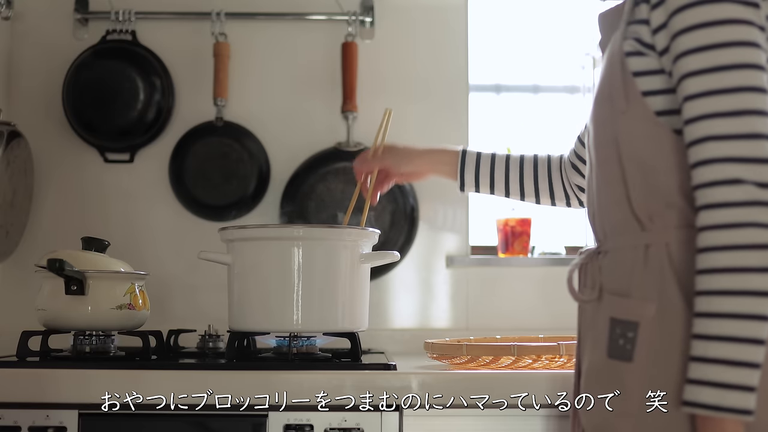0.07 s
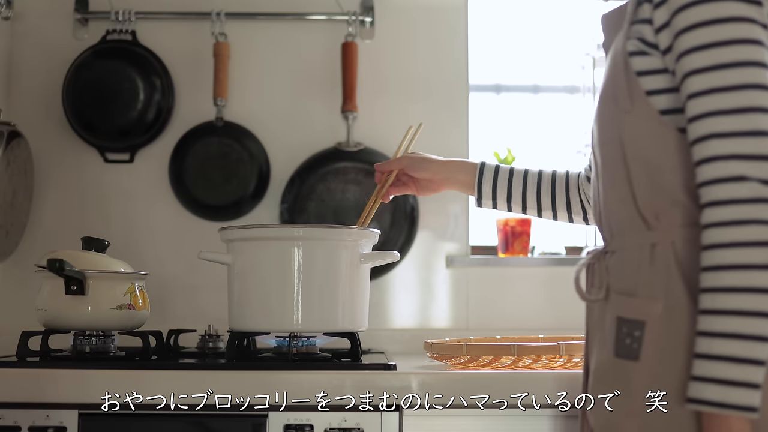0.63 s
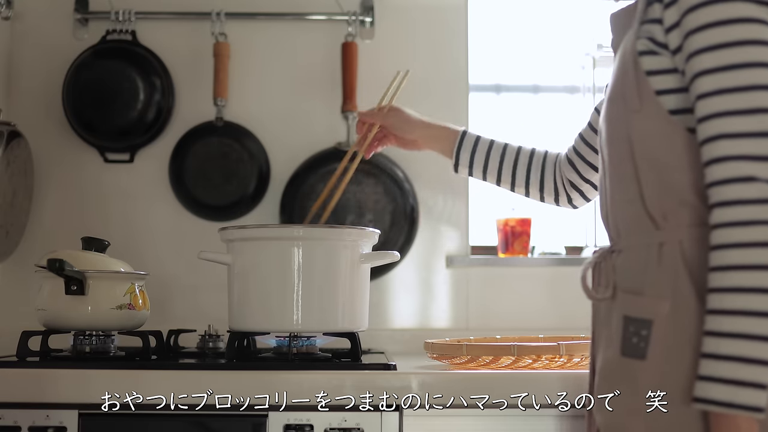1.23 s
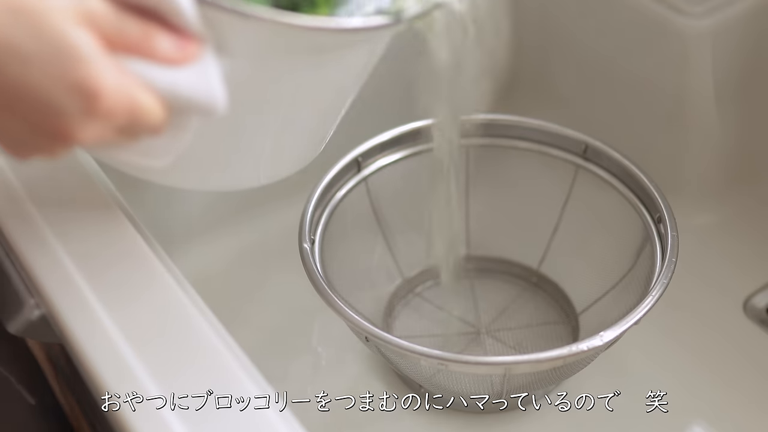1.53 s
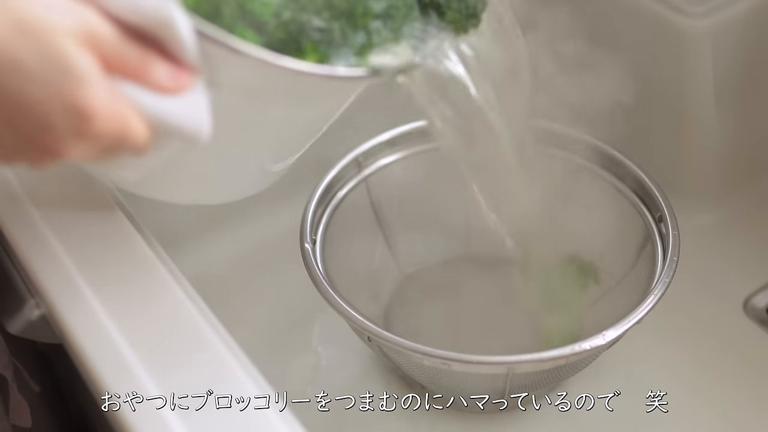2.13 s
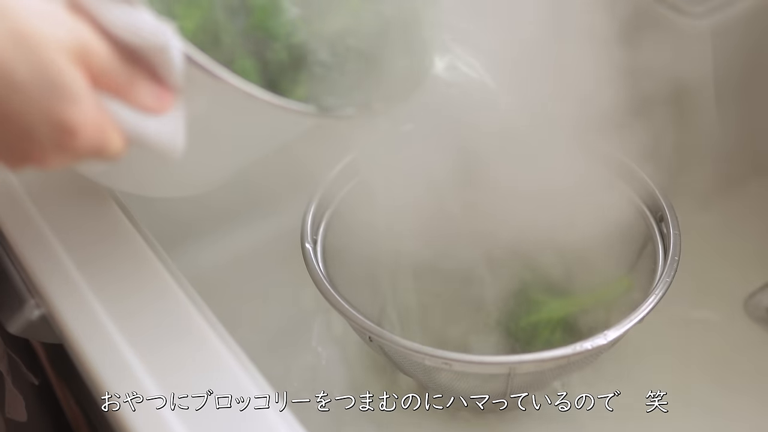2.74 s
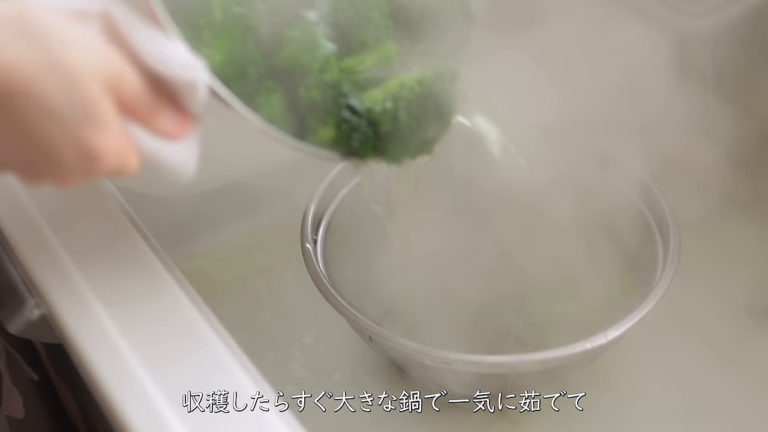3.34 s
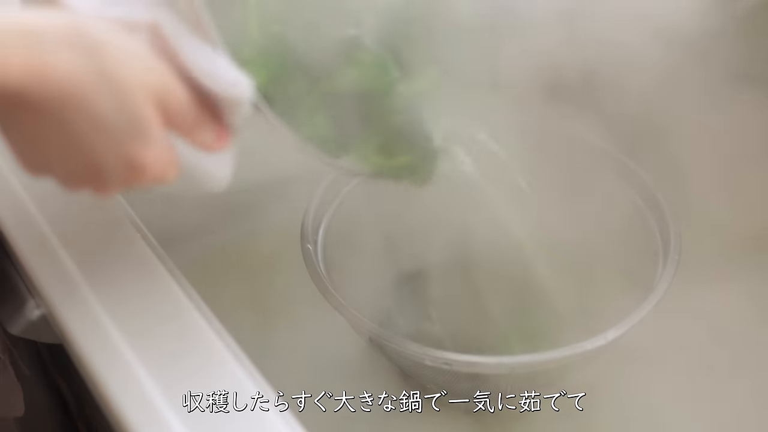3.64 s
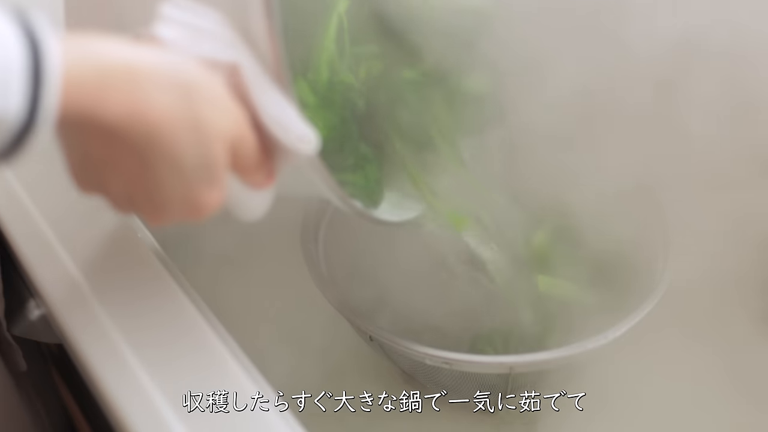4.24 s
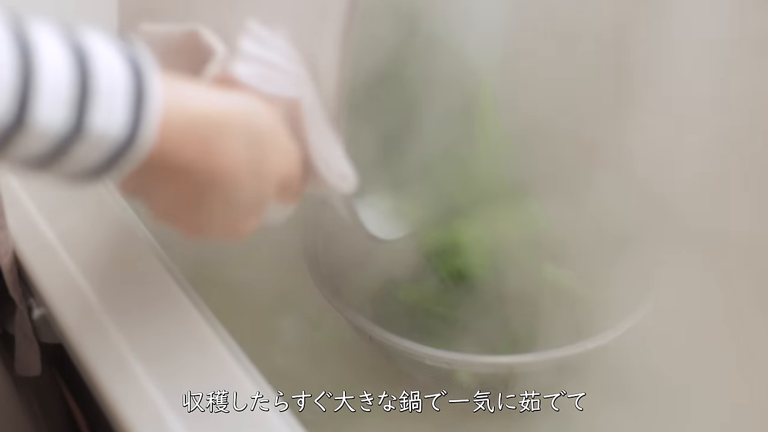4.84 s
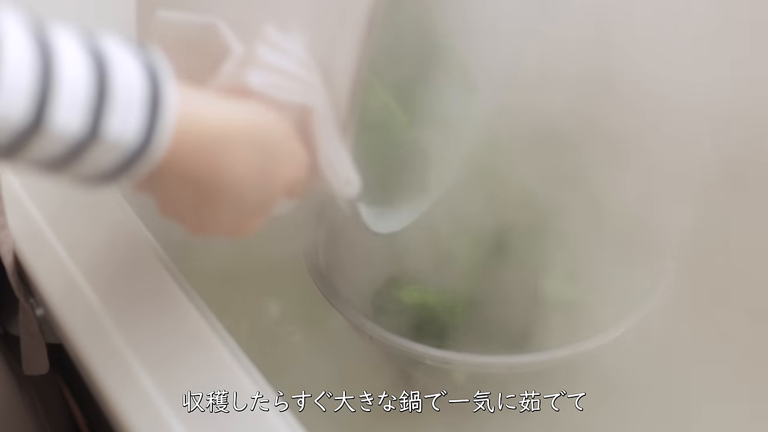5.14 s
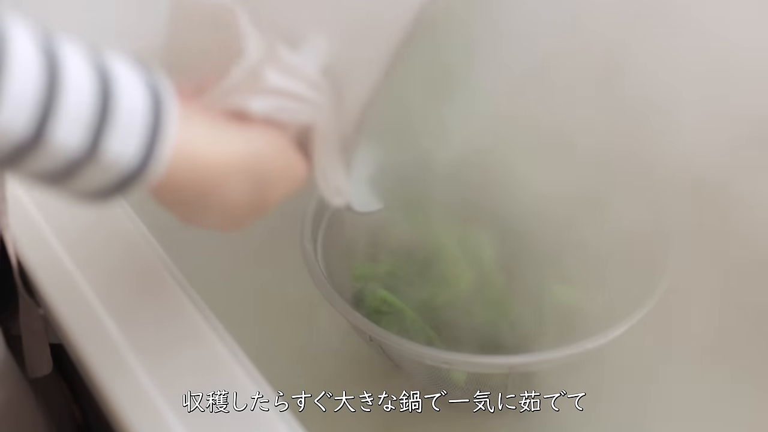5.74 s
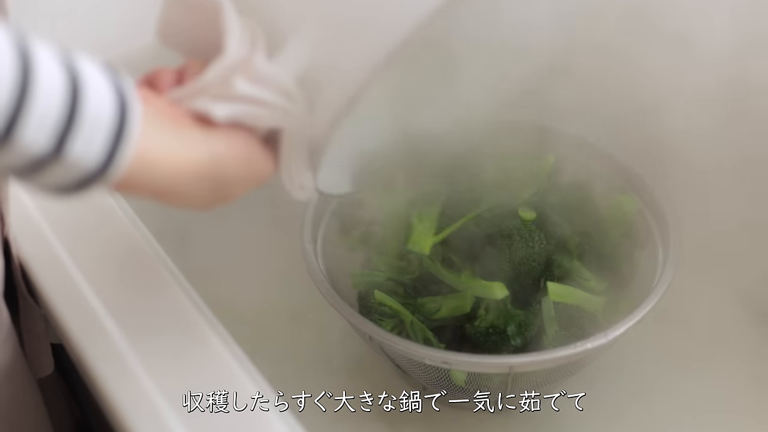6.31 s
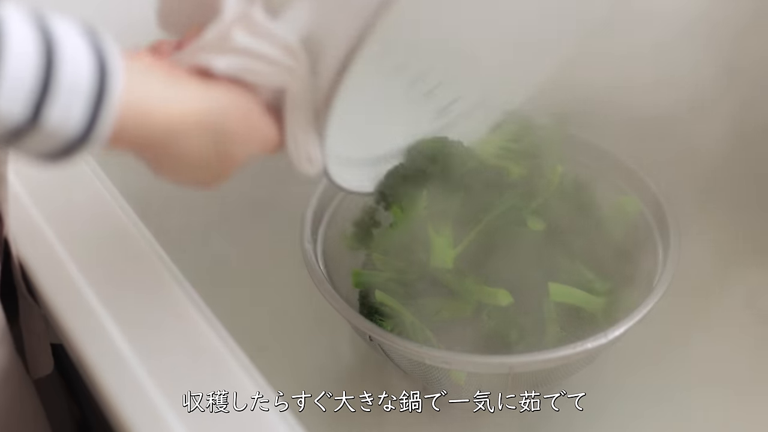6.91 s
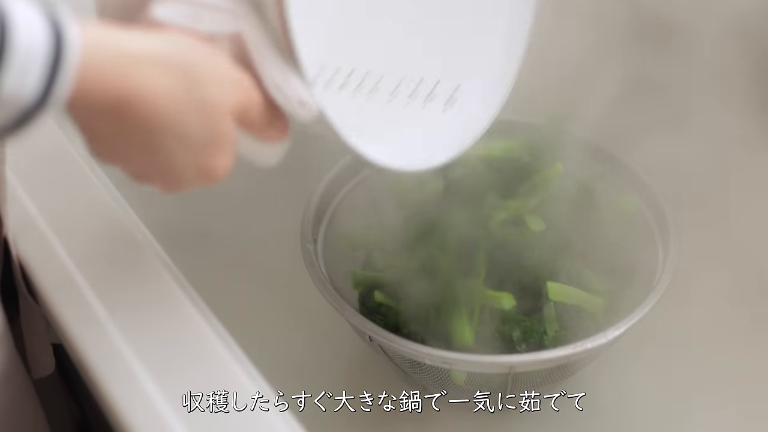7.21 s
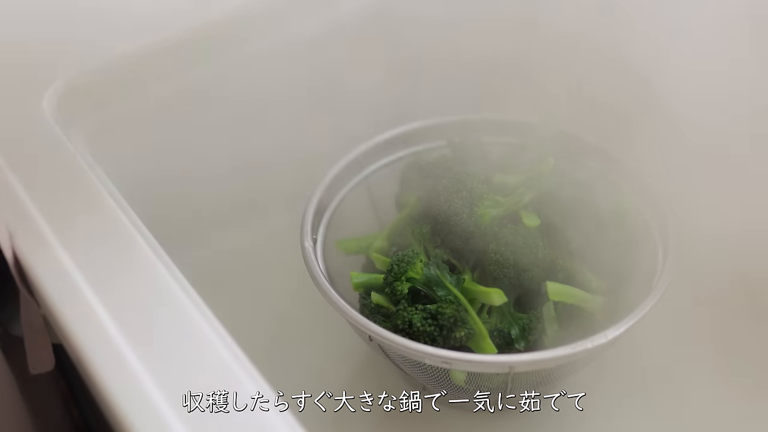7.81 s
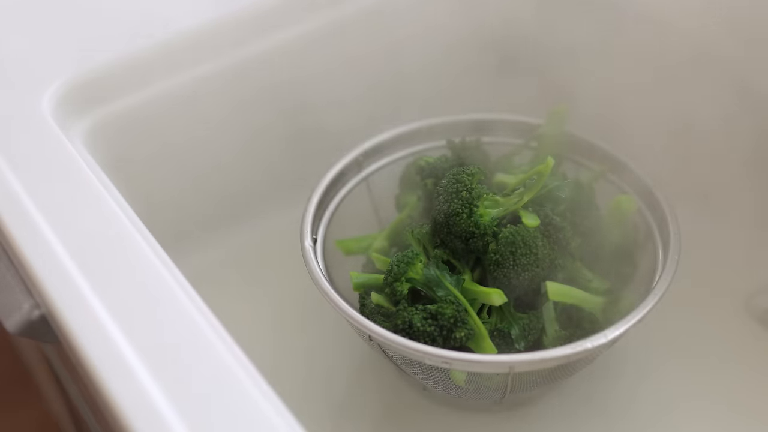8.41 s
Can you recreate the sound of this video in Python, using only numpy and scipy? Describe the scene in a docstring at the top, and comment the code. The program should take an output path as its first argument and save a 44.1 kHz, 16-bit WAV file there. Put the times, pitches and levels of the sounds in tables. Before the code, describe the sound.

A pot simmers softly over a hissing gas burner, then the sound cuts off. Water pours into a wire colander in a kitchen sink, spattering and bubbling, with gushes slapping the basin. Boiled vegetables tumble in with soft, low thuds. The pour thins to a dull trickle, a few drips and hollow gulps from the drain. Everything is heard close up in a small kitchen.

```python
"""Draining a pot of broccoli

A pot simmers over a hissing gas burner; then its hot water and broccoli are poured into a wire
colander in a steel sink. Droplet impacts and ringing air bubbles make the spatter, gushes slap the
basin, and falling florets and the gulping drain excite its low resonances. The pour thins to a dull
gurgle with a few drips."""
import sys
import numpy as np
from scipy import signal
from scipy.fft import rfft, irfft, next_fast_len
from scipy.io import wavfile
from scipy.ndimage import uniform_filter1d

SR = 44100
rng = np.random.default_rng(int(sys.argv[2]) if len(sys.argv) > 2 else 0)


def to_wav(s):
    """Save 16-bit WAV."""
    ch = np.atleast_2d(s).T  # columns
    pcm = np.round(np.clip(ch, -1, 1) * 32767)  # PCM
    wavfile.write(sys.argv[1], SR, pcm.astype(np.int16))


N = 373086
T = np.arange(N) / SR
STOVE_END_S, POUR_START_S, SEEP_START_S = 1.427, 1.645, 5.37

# Spectra of the burner and of the quiet kitchen: (frequency [Hz], relative level [dB])
STOVE_SPECTRUM = [(30, -23), (145, -11), (252, -1.5), (721, -4.5), (1070, -7.5), (1540, -5), (2000, -9.5),
                  (2650, -8.5), (3400, -11), (11400, -23), (13300, -21.5), (16000, -32)]
ROOM_SPECTRUM = [(24, -35.5), (40, -1.5), (306, -10), (502, 2.5), (1000, -12.5), (6460, -15.5),
                 (15000, -19.5)]
# Strength of the stream as the pot is tipped: (time [s], level [dB])
POUR_LEVELS = [(1.65, -45), (1.77, -37), (1.97, -37.5), (2.2, -37), (2.37, -42.5), (2.6, -43.5),
               (2.94, -36), (3.33, -35.5), (3.68, -39.5), (3.96, -39.5), (4.07, -40.5), (4.32, -38),
               (4.42, -45), (4.8, -44), (4.95, -49), (5.04, -44.5), (5.26, -51.5), (5.33, -55.5)]
# Spectrum of droplets on mesh and steel: (frequency [Hz], relative level [dB])
SPATTER_SPECTRUM = [(350, -47.5), (600, -14), (920, 2), (1110, 1), (1240, -1.5), (1430, -5), (2180, 0.5),
                    (3120, 4), (4050, 1.5), (6290, -2), (12000, -10.5), (14700, -16.5), (16000, -17)]
# Modes of sink and colander, rung by droplets: (frequency [Hz], relative level [dB], t60 [s])
STEEL_MODES = [(891, -27.5, 0.087), (1950, -28, 0.052), (2550, -26, 0.032), (2860, -23.5, 0.02),
               (1167, -22.5, 0.044), (6170, -23, 0.047)]
# Low middle of the splash against its patter: (time [s], relative level [dB])
SPLASH_BODY_LEVELS = [(1.92, -16.5), (2.33, -3), (3.2, -10.5), (3.9, -4), (4.3, -4.5), (4.45, -11.5),
                      (5.1, -8.5), (5.4, -3.5)]
# Spectra of the drumming sink floor and the drain's hollow: (frequency [Hz], relative level [dB])
DRUM_SPECTRUM = [(40, -26.5), (55, -26), (85, -10), (112, -16), (168, 3), (215, -5), (500, -12),
                 (900, -51.5)]
HOLLOW_SPECTRUM = [(150, -39.5), (260, -10.5), (330, -2), (380, 2.5), (440, -0.5), (520, -10.5),
                   (610, -16.5), (720, -12), (900, -27), (1500, -63.5)]
# Swells of low gurgling and drumming, from tumbling florets or the gulping drain:
# (time [s], peak level [dB], rise [dB/s], fall [dB/s], relative level on the floor [dB])
GURGLE_SURGES = [(2.06, -74, 69, 110, 17), (2.705, -46.5, 166, 198, -8), (3.65, -50, 45, 73, 0),
                 (3.96, -46, 110, 32, -3.5), (4.55, -50, 133, 63, -15), (5.14, -44.5, 31, 24.5, -19.5),
                 (5.37, -47.5, 200, 71, -6.5), (5.58, -50, 197, 104, -9.5), (5.88, -56, 168, 61, -8),
                 (6.17, -50.5, 60, 59, -10), (6.62, -43, 36.5, 22.5, -18), (6.87, -46, 85, 44.5, -10),
                 (7.14, -51.5, 109.5, 34.5, -18), (7.44, -58.5, 110.5, 62, -16.5),
                 (7.94, -56.5, 75, 25, -14.5), (8.258, -47, 257.5, 87.5, -19), (8.46, -51, 111.5, 90, -9)]
# Blows on the basin and gulps of the drain: (time [s], peak level [dB], pitch [Hz], swell time [s])
BASIN_THUDS = [(1.665, -48, 174, 0.015), (1.779, -48.5, 205, 0.013), (1.963, -46.5, 171, 0.02),
               (2.06, -45.5, 161, .025), (2.692, -38, 372, 0.0081), (2.713, -38, 260, 0.008),
               (2.808, -35, 169, 0.0086), (3.555, -19.5, 278, 0.0043), (3.592, -26, 298, 0.0045),
               (3.664, -38, 205, 0.014), (3.709, -33, 273, 0.0092), (3.763, -31.5, 190, 0.0059),
               (3.859, -33, 310, .005), (3.878, -29, 370, 0.005), (3.928, -23.5, 346, 0.0041),
               (3.948, -26.5, 400, 0.0067), (3.975, -21, 315, 0.0042), (3.994, -34, 290, 0.0038),
               (4.074, -38, 234, 0.0067), (4.109, -31.5, 208, 0.0084), (4.215, -37, 410, 0.01),
               (4.552, -39, 337, 0.017), (4.574, -42, 340, 0.0091), (4.691, -39.5, 315, 0.02),
               (4.844, -38.5, 312, 0.01), (4.857, -45, 180, 0.012), (4.964, -31, 354, 0.0074),
               (5.046, -34, 348, 0.005), (5.1, -30, 403, 0.0065), (5.123, -26, 377, 0.0083),
               (5.143, -35.5, 379, .008), (5.298, -24.5, 368, 0.0051), (5.362, -47.5, 180, 0.014),
               (5.445, -35, 390, 0.0081), (5.565, -33.5, 396, 0.008), (5.584, -46, 194, 0.014),
               (6.146, -34.5, 343, 0.01), (6.166, -34, 360, 0.015), (6.198, -35, 350, 0.0087),
               (6.216, -35.5, 365, 0.012), (6.294, -33.5, 362, 0.0082), (6.361, -34, 232, 0.0077),
               (6.384, -29.5, 345, 0.0049), (6.4, -34, 363, 0.0049), (6.485, -30, 356, 0.0058),
               (6.556, -24.5, 388, 0.0067), (6.619, -19.5, 397, 0.0049), (6.632, -28.5, 397, 0.011),
               (6.654, -31.5, 373, 0.016), (6.696, -29.5, 429, 0.0043), (6.721, -30, 383, .007),
               (6.76, -31, 377, 0.018), (6.812, -36, 260, .006), (6.823, -25, 370, 0.0081),
               (6.835, -22.5, 390, 0.0047), (6.846, -25, 440, 0.0044), (6.861, -25, 372, 0.01),
               (6.913, -33, 275, 0.0062), (6.938, -31, 294, 0.0054), (6.95, -26.5, 369, 0.0057),
               (7.007, -36, 226, 0.011), (7.012, -26.5, 373, 0.0081), (7.123, -29, 385, 0.0091),
               (7.295, -39.5, 387, .007), (7.316, -40.5, 340, 0.011), (7.345, -50, 206, 0.012),
               (7.702, -52, 362, 0.0063), (7.936, -42, 421, 0.009), (8.218, -33, 398, 0.0056),
               (8.256, -30, 401, 0.017), (8.268, -47, 225, 0.013), (8.293, -38, 407, .009)]
# Modes of the basin and of its floor, rung by thuds: (frequency [Hz], gain [dB], t60 [s])
BASIN_RESONANCES = [(304, -4, 0.16), (358, 4, 0.12), (463, -8, 0.12), (727, 7.5, .14)]
FLOOR_RESONANCES = [(168, -49, 0.14), (199, -47, 0.048)]
# Single drops ticking on the steel: (time [s], level [dB], pitch [Hz])
DROP_TICKS = [(1.8246, -29, 4800), (2.138, -23, 5080), (2.4424, -22.5, 4700), (2.445, -21.5, 6220),
              (2.9076, -20, 3500), (3.1268, -26.5, 3130), (3.1815, -24, 3670), (3.317, -24, 4130),
              (3.6179, -24.5, 2610), (3.9472, -26.5, 5530), (4.633, -40, 2470), (5.012, -27, 4300),
              (5.5615, -48, 2510), (5.811, -47, 5700), (6.0114, -53, 2740), (6.257, -51, 2500),
              (6.518, -54, 3630), (6.768, -51.5, 5920), (6.892, -56, 2970), (7.5571, -63, 5790),
              (7.701, -63.5, 3550), (8.371, -57, 3280)]
# Air pockets closing with a plop: (time [s], level [dB], pitch [Hz])
AIR_POCKETS = [(1.825, -47, 700), (2.055, -36.5, 980), (2.429, -39, 930), (2.837, -31.5, 920),
               (2.925, -36, 900), (3.176, -35, 756), (3.796, -26, 1900), (4.123, -27.5, 2390),
               (4.508, -37.5, 1980), (4.588, -40, 1890), (4.684, -39.5, 1030), (5.005, -32.5, 2010),
               (5.127, -40, 730), (5.37, -40.5, 1890), (5.443, -49, 789), (5.97, -49, 730),
               (6.165, -49, 720), (6.49, -49.5, 690), (6.6, -49.5, 1360), (6.615, -49, 1360),
               (6.648, -48, 1370), (6.698, -39.5, 706), (6.736, -49.5, 740), (6.833, -42, 726),
               (6.848, -41, 673), (6.88, -47, 720), (6.962, -54.5, 1800), (7.009, -47, 784),
               (7.211, -49.5, 850), (7.418, -52.5, 846), (7.476, -54, 779), (7.577, -55, 828),
               (7.703, -60, 660), (8.003, -58, 1965), (8.292, -47.5, 970), (8.294, -59, 1590),
               (8.384, -55, 1630)]
# Gushes and florets slapping the basin: (time [s], crack level [dB], fall time [s], thump level [dB])
GUSH_SLAPS = [(1.912, -32, .005, -60), (1.945, -27, .004, -57), (2.092, -23, 0.011, -34),
              (2.106, -26.5, 0.0076, -28), (3.161, -35, 0.0037, -54), (2.774, -18, 0.0082, -20.5),
              (2.902, -27.5, 0.018, -32), (3.314, -39, 0.011, -35.5), (3.739, -17.5, 0.0045, -26),
              (3.76, -33, 0.0063, -30.5), (3.792, -33.5, 0.034, -42), (4.016, -29.5, 0.016, -37),
              (4.058, -27, 0.017, -40), (4.12, -28.5, 0.003, -38), (4.188, -26, 0.0053, -54),
              (4.216, -24, 0.0037, -51), (4.24, -30.5, 0.008, -35.5), (4.287, -32, 0.0029, -38),
              (4.507, -32, 0.0043, -47), (4.586, -31.5, 0.0074, -57), (4.683, -32.5, 0.0044, -37.5),
              (4.762, -38, 0.015, -49), (4.791, -38, 0.0092, -42), (4.851, -38, 0.0044, -57),
              (5.004, -37, 0.011, -39.5), (5.223, -37, .005, -62), (5.235, -43, 0.014, -45),
              (5.662, -51, 0.0042, -76)]
# Spectra of a slap's crack, splat and boom: (frequency [Hz], relative level [dB])
CRACK_SPECTRUM = [(500, -32.5), (1500, -6), (2800, 1), (5500, -1.5), (8000, -5), (15000, -16.5)]
SPLAT_SPECTRUM = [(250, -21), (560, -9), (800, 3), (1100, 4.5), (1700, -4), (4000, -8), (8000, -25.5)]
BOOM_SPECTRUM = [(25, -32), (42, -12.5), (110, -15.5), (170, 1), (260, -5.5), (560, -9), (1000, -33.5)]
# Lapping of the trickle out of the heap, with its lulls: (time [s], level [dB])
TRICKLE_LEVELS = [(5.6, -67.5), (5.78, -68.5), (6.03, -64), (6.35, -66), (7.57, -69.5), (7.68, -79),
                  (7.76, -71), (7.87, -74.5), (8.0, -71)]
# Spectra of fine dripping and of lapping on the sink floor: (frequency [Hz], relative level [dB])
DRIP_SPECTRUM = [(1000, -8), (2000, 1.5), (3200, -2), (4500, -8), (6000, -7), (9000, -14), (15000, -23)]
LAP_SPECTRUM = [(450, -27), (700, -3), (850, -0.5), (1100, -4), (1500, -8.5), (2000, -16.5), (3500, -55)]


def undb(db):
    """The decibel scale: 20 dB is a factor of ten in amplitude."""
    return 10 ** (np.asarray(db) / 20)


def unit(x):
    """Normalisation to rms 1."""
    return x / np.sqrt(np.mean(x ** 2) + 1e-30)


def curve(table):
    """Linear interpolation of (time [s], level [dB]) points."""
    return np.interp(T, *np.transpose(table))


def decay_from(start_s, db, db_per_s):
    """Exponential decay: a gain that holds until start_s, then falls evenly in dB."""
    return undb(db - db_per_s * np.maximum(T - start_s, 0))


def add(out, s, x):
    """Superposition of x on out from time s on."""
    i = max(int(s * SR), 0)
    out[i:i + len(x)] += x[:max(N - i, 0)]


def colour(x, spectrum, size=4096):
    """Minimum-phase filtering to the given spectrum, by folding the cepstrum; rms 1."""
    hz, db = np.transpose(spectrum)
    bins_hz = np.maximum(np.fft.rfftfreq(size, 1 / SR), 1)
    gain = undb(np.interp(np.log(bins_hz), np.log(hz), db))
    cepstrum = irfft(np.log(gain))
    cepstrum[1:size // 2] *= 2
    cepstrum[size // 2 + 1:] = 0
    response = irfft(np.exp(rfft(cepstrum)))
    return unit(signal.oaconvolve(x, response)[:len(x)])


def band(x, lo_hz, hi_hz, order=4):
    """Band-pass filtering."""
    edges = [lo_hz, min(hi_hz, SR / 2 - 1)]
    return signal.sosfilt(signal.butter(order, edges, "band", fs=SR, output="sos"), x)


def waver(rate):
    """Random modulation: ramps between new values, rate times a second; rms 1."""
    hold = max(int(SR / rate), 1)
    steps = np.repeat(rng.standard_normal(N // hold + 1), hold)
    return unit(uniform_filter1d(steps, hold)[:N])


def sizes(count, spread_db):
    """A power law of amplitudes: many small, a few large."""
    return undb(spread_db * np.minimum(rng.exponential(size=count), 4))


def impacts(rate, spread_db):
    """Shot noise: independent impulses, on average rate a second; rms 1."""
    size = sizes(N, spread_db)
    return unit((rng.random(N) < rate / SR) * size * rng.choice([-1, 1], N))


def ring(x, hz, t60):
    """A damped resonator driven by x, dying by 60 dB in t60 seconds."""
    pole = np.exp((2j * np.pi * hz - np.log(1000) / t60) / SR)
    return signal.lfilter([1], [1, -pole], x + 1e-18).imag


def stove():
    """Broadband burner hiss and the shot noise of simmering, ending abruptly before the pour."""
    simmer = unit(rng.standard_normal(N) + undb(-8.5) * impacts(rate=460, spread_db=2.5))
    simmer *= undb(0.35 * waver(rate=7))
    gate = np.clip((STOVE_END_S - T) / 0.0033 + 0.5, 0, 1)
    return colour(simmer, STOVE_SPECTRUM) * undb(-55.5) * gate


def kitchen():
    """Ambient noise: a faint room tone that fades out under the water."""
    return colour(rng.standard_normal(N), ROOM_SPECTRUM) * undb(-70.5) * np.interp(T, [5, 7], [1, 0])


def flow():
    """Flow sets amplitude: the stream starts at once, follows the pot's tilt and dries up."""
    onset = np.clip((T - POUR_START_S) / 0.0017, 0, 1)
    empty_s = POUR_LEVELS[-1][0]
    return onset * decay_from(empty_s, curve(POUR_LEVELS), db_per_s=38.5)


def spatter(rate, spread_db, tail_s):
    """Incoherent sources add in energy: each droplet breaks up into a decaying burst of noise."""
    retention = np.exp(-2 / (tail_s * SR))
    energy = signal.lfilter([1], [1, -retention], impacts(rate, spread_db) ** 2 + 1e-18)
    return unit(np.sqrt(energy) * rng.standard_normal(N))


def fizz(rate_per_khz, spread_db, cycles):
    """Bubble resonance in 64 sizes: the smaller bubbles ring higher, die sooner and are more frequent."""
    out = np.zeros(N)
    for hz in np.geomspace(700, 15500, 64):
        count = int(rate_per_khz * hz / 1000 * N / SR)
        births = np.zeros(N)
        births[rng.integers(0, N, count)] = sizes(count, spread_db) * rng.choice([-1, 1], count)
        out += np.sqrt(hz) * unit(ring(births, hz, cycles / hz))
    return unit(out)


def wander(x, bands=12):
    """Timbre depends on the point of impact: as the stream shifts, its bands swell and sink separately."""
    size = next_fast_len(N)
    log_hz = np.log(np.fft.rfftfreq(size, 1 / SR) + 1)
    place = np.interp(log_hz, np.log([800, 12000]), [0, bands - 1])
    spectrum = rfft(x, size)
    out = np.zeros(N)
    for k in range(bands):
        triangle = np.maximum(1 - abs(place - k), 0)
        out += irfft(spectrum * triangle, size)[:N] * undb(1.5 * waver(rate=24))
    return unit(out)


def stream(pour):
    """Impact noise and bubble resonance: droplets click on mesh and steel, ring them and trap air."""
    water = spatter(rate=800, spread_db=3, tail_s=0.0022)
    water += undb(-5.5) * spatter(rate=74, spread_db=1, tail_s=0.044)
    water += undb(-2.5) * impacts(rate=2300, spread_db=3)
    water += undb(-2.5) * fizz(rate_per_khz=12, spread_db=2.5, cycles=10)
    # the pool under the colander traps fewer, larger bubbles that ring on longer
    pool = band(fizz(rate_per_khz=3.5, spread_db=1, cycles=52), 630, 3200, order=1)
    water = colour(unit(water) + undb(-5) * pool, SPATTER_SPECTRUM) * undb(waver(rate=60))
    steel = sum(undb(db) * unit(ring(water, hz, t60)) for hz, db, t60 in STEEL_MODES)
    water = wander(water + steel)
    water *= undb(1.43 * (T > 4.35) * waver(rate=90))  # the last of the water comes in dollops
    body = unit(band(water, 590, 1684)) * undb(curve(SPLASH_BODY_LEVELS))
    patter = unit(band(water, 1900, 7030))
    # lone droplets on bare metal stand out at the very top
    pricks = unit(band(spatter(rate=110, spread_db=6, tail_s=0.0011), 5000, 17000, order=2))
    flare_db = 6 * np.exp(-((T - 3.16) / 0.045) ** 2 / 2)  # the spray flares once at full flow
    spray = (unit(band(water, 7530, SR / 2)) + undb(-6.5) * pricks) * undb(flare_db - 6)
    return (body + patter + spray) * pour


def blips(events, glide):
    """Wave packets: rounded tones that swell and die, rising in pitch by the share glide per swell time."""
    out = np.zeros(N)
    for s, db, hz, swell_s in events:
        age = np.arange(int(6 * swell_s * SR)) / SR / swell_s  # 1 at the peak
        envelope = (age * np.exp(1 - age)) ** 5
        phase = 2 * np.pi * hz * swell_s * (age - 1 + glide * (age - 1) ** 2 / 2)
        add(out, s - swell_s, undb(db) * envelope * np.sin(phase + rng.uniform(0, 2 * np.pi)))
    return out


def bubble_swell_s(hz):
    """A scaling law: larger, lower bubbles sound for longer."""
    return 0.006 * (1000 / hz) ** 0.55


def gurgles(pour, count=600):
    """Bubble resonance: single pockets of air trapped by the stream sing out above it."""
    gap, size, octaves = rng.standard_normal((count, 3)).T
    times = POUR_START_S + np.cumsum(np.exp(0.5 * gap)) / 110  # about 100 a second
    hz = np.clip(2970 * 2 ** (0.6 * octaves), 750, 8000)
    db = -4 + 3 * np.minimum(size, 2)
    bubbles = [row for row in zip(times, db, hz, bubble_swell_s(hz)) if row[0] < T[-1]]
    return blips(bubbles, glide=0.02) * pour


def fill_out(x, fill_s=0.22):
    """A fading notch: the pour opens as a thin hiss; its middle range fills in over the first moments."""
    thinness = np.exp(-(np.maximum(T - POUR_START_S, 0) / fill_s) ** 2)
    return x - 0.59 * thinness * band(x, 1300, 3300, order=1)


def surges():
    """Energy summation of swells of gurgling and drumming: the gains in the hollow and on the floor."""
    hollow, floor = np.zeros((2, N))
    for s, db, rise, fall, floor_db in GURGLE_SURGES:
        gain = undb(db - np.maximum(rise * (s - T), fall * (T - s)))
        hollow = np.hypot(hollow, gain)
        floor = np.hypot(floor, gain * undb(floor_db))
    return hollow, floor


def basin(pour, surge, weight):
    """Plate and cavity resonance: stream and florets drum on the floor, water churns in the drain."""
    # the dry basin drums louder until water covers it
    bare_db = 11 * np.exp(-np.maximum(T - POUR_START_S, 0) / 0.032)
    drum = colour(impacts(rate=600, spread_db=2), DRUM_SPECTRUM)
    drum *= np.hypot(pour * undb(bare_db - 20), weight)
    churn = colour(impacts(rate=210, spread_db=0.46), HOLLOW_SPECTRUM)
    churn *= np.hypot(pour * undb(-30), surge)
    return drum * undb(waver(rate=15)) + churn  # the wandering stream drums unevenly


def small_thuds(surge, count=400, swell_s=0.0095):
    """A random pulse train: lesser blows that scale with the surge, as rows like those of BASIN_THUDS."""
    gap, size, pitch = rng.standard_normal((count, 3)).T
    times = POUR_START_S + np.cumsum(np.exp(0.5 * gap)) / 18  # about 16 a second
    levels = 20 * np.log10(np.interp(times, T, surge)) + 3 + 2 * size
    pitches = 366 * 2 ** (0.22 * pitch)
    return [(s, db, hz, swell_s) for s, db, hz in zip(times, levels, pitches) if s < T[-1]]


def thuds(surge):
    """Modal response: soft blows and gulps leave the basin and its floor ringing faintly."""
    blows = blips(BASIN_THUDS + small_thuds(surge), glide=0.022)
    blows = signal.sosfiltfilt(signal.butter(3, 125, "high", fs=SR, output="sos"), blows)
    basin_ring = sum(undb(db) * ring(blows, hz, t60) for hz, db, t60 in BASIN_RESONANCES)
    floor_ring = sum(undb(db) * ring(blows, hz, t60) for hz, db, t60 in FLOOR_RESONANCES)
    return blows + undb(-55.5) * basin_ring + floor_ring


def drops(crack_s=0.0013, splutter_s=0.015, ring_s=0.0016):
    """Impact and air entrainment: each drop cracks, rings a tiny bubble and splutters faintly."""
    out, t = np.zeros(N), T[:SR // 12]
    attack = np.minimum(t / 0.00037, 1)
    splash_envelope = undb(-4.5) * np.exp(-t / crack_s) + undb(-16.5) * np.exp(-t / splutter_s)
    for s, db, hz in DROP_TICKS:
        noise = unit(band(rng.standard_normal(len(t)), 0.7 * hz, 1.3 * hz, order=2))
        bubble = np.sin(2 * np.pi * hz * t) * np.exp(-t / ring_s)
        add(out, s, undb(db) * (bubble + noise * splash_envelope) * attack)
    return out


def plops():
    """Cavity closure: a pocket of air shuts with a wet squelch and resonates as one bubble."""
    squelches, t, bubbles = np.zeros(N), T[:SR // 8], []
    for s, db, hz in AIR_POCKETS:
        swell_s = bubble_swell_s(hz)
        noise = unit(band(rng.standard_normal(len(t)), hz / 1.39, hz * 1.25, order=2))
        envelope = np.minimum(t / swell_s, 1) * np.exp(-t / (5 * swell_s))
        add(squelches, s - swell_s, undb(db - 5) * noise * envelope)
        bubbles.append((s, db, hz, swell_s))
    return squelches + blips(bubbles, glide=0.033)


def burst(peak_s, swell_s, fall_s):
    """A transient envelope: exponential growth to 1 at peak_s, then exponential decay."""
    out, t = np.zeros(N), T[:SR // 2] - 0.1
    add(out, peak_s + t[0], np.exp(np.minimum(t / swell_s, -t / fall_s)))
    return out


def slaps():
    """Liquid impact: a gush cracks and splats, then the floor booms and thrown-up water patters back."""
    crack, thump, boom, wash = np.zeros((4, N))
    for s, crack_db, fall_s, thump_db in GUSH_SLAPS:
        landing = burst(s, 0.12 * fall_s, fall_s)
        crack += undb(crack_db) * landing
        thump += undb(thump_db) * landing
        boom += undb(thump_db - 14) * burst(s + 0.014, swell_s=0.007, fall_s=0.028)
        wash += undb(thump_db - 12) * burst(s + 0.02, swell_s=0.024, fall_s=0.042)
    spray = crack * colour(rng.standard_normal(N), CRACK_SPECTRUM)
    droplets = spatter(rate=420, spread_db=2.5, tail_s=0.0015)
    patter = undb(0.5) * wash * colour(droplets, CRACK_SPECTRUM)
    splat = np.hypot(thump, wash) * colour(rng.standard_normal(N), SPLAT_SPECTRUM)
    return spray + patter + splat + boom * colour(rng.standard_normal(N), BOOM_SPECTRUM)


def trickle(surge):
    """Drainage: the last water seeps through the florets, drips and laps; each surge stirs up more."""
    ticks = fizz(rate_per_khz=1.2, spread_db=4.5, cycles=53)
    ticks += undb(5.5) * spatter(rate=300, spread_db=3.5, tail_s=0.013)
    laps = spatter(rate=260, spread_db=0, tail_s=0.0098)
    laps += undb(-7) * fizz(rate_per_khz=2.5, spread_db=0, cycles=22)
    drip_gain = np.hypot(decay_from(SEEP_START_S, db=-63.5, db_per_s=7.5), undb(-27.5) * surge)
    lap_gain = np.hypot(undb(curve(TRICKLE_LEVELS)), undb(-18.5) * surge)
    onset = np.clip((T - SEEP_START_S) / 0.21, 0, 1)
    return (colour(ticks, DRIP_SPECTRUM) * drip_gain + colour(laps, LAP_SPECTRUM) * lap_gain) * onset


def reflections(x, t60, wet_db):
    """Reverberation: a dense, dying cloud of echoes from nearby walls follows the direct sound."""
    t = T[:SR // 2]
    tail = rng.standard_normal(len(t)) * 1000 ** (-t / t60) * (t > 0.002)
    return x + undb(wet_db) * signal.oaconvolve(x, tail / np.linalg.norm(tail))[:N]


def scene():
    """Superposition in one channel: the stove, then the sink, heard close up in a small kitchen."""
    pour = flow()
    surge, weight = surges()
    sink = fill_out(stream(pour) + gurgles(pour)) + basin(pour, surge, weight)
    sink += trickle(surge) + slaps() + drops() + plops() + thuds(surge)
    reverberant_sink = reflections(sink, t60=0.22, wet_db=-20)
    return (stove() + kitchen() + reverberant_sink)[None]


def record(dry):
    """Band limiting: filters cut the deepest rumble and the extreme treble."""
    high_pass = signal.butter(2, 42, "high", fs=SR, output="sos")
    low_pass = signal.ellip(10, 0.2, 80, 15900, fs=SR, output="sos")
    return signal.sosfilt(low_pass, signal.sosfilt(high_pass, dry))


dry = scene()
out = record(dry)
to_wav(out)
```